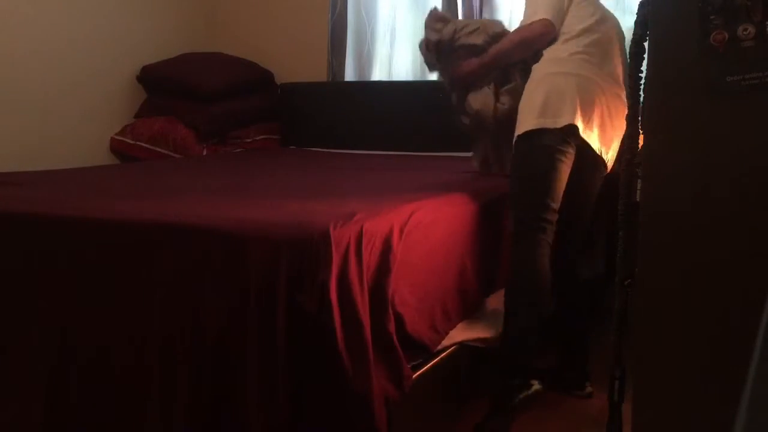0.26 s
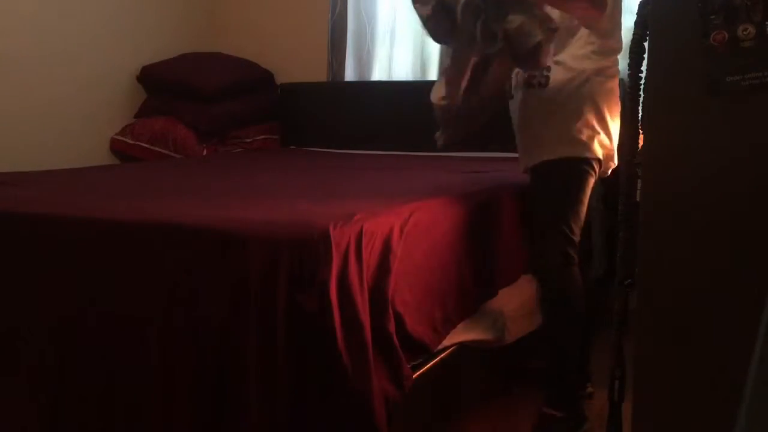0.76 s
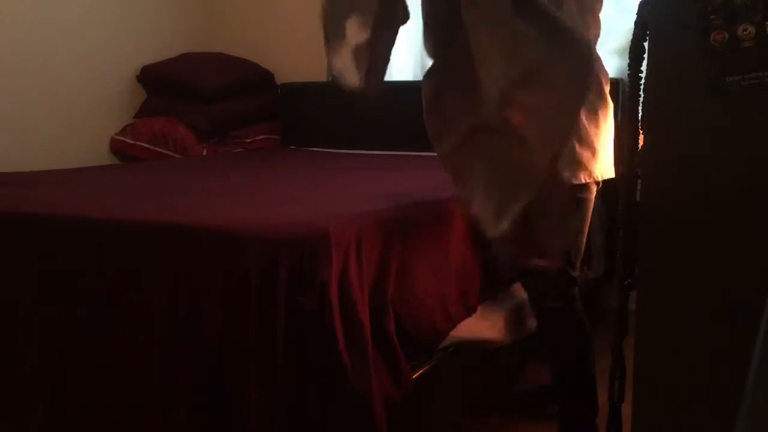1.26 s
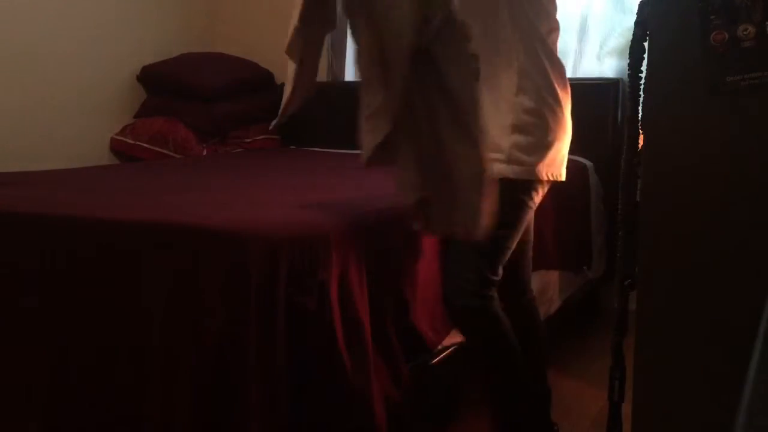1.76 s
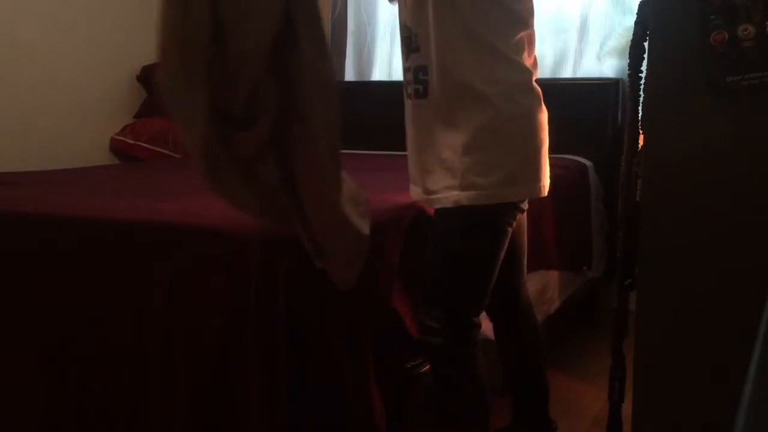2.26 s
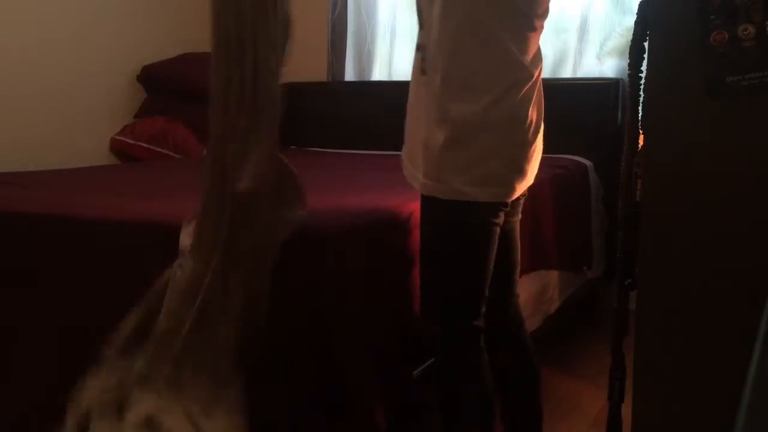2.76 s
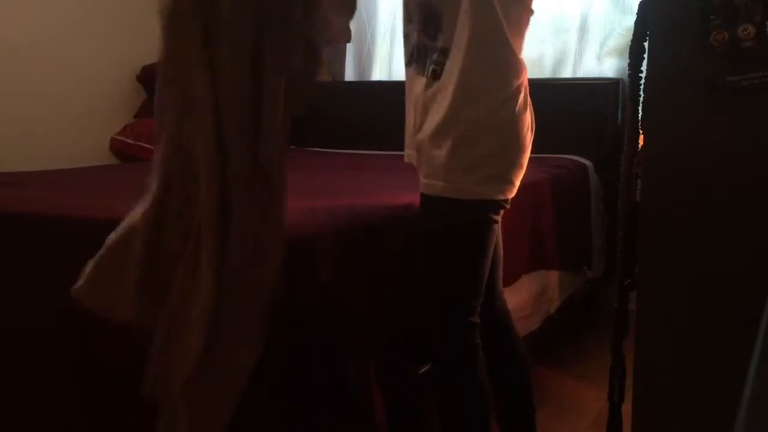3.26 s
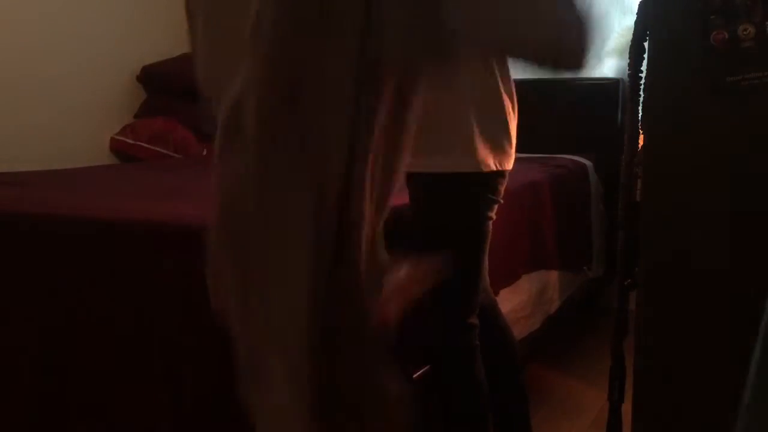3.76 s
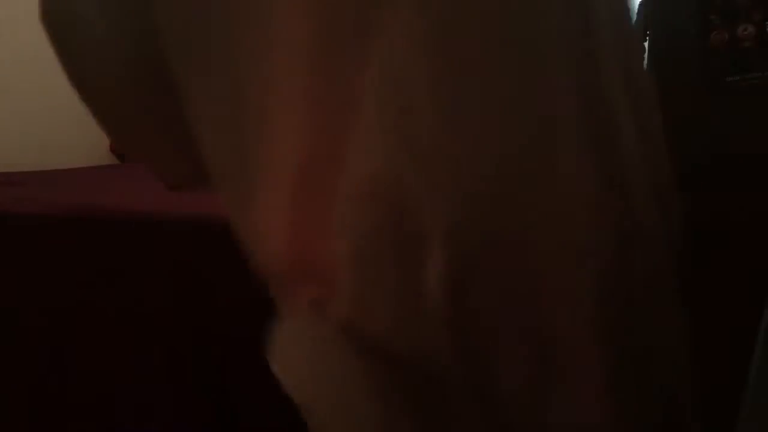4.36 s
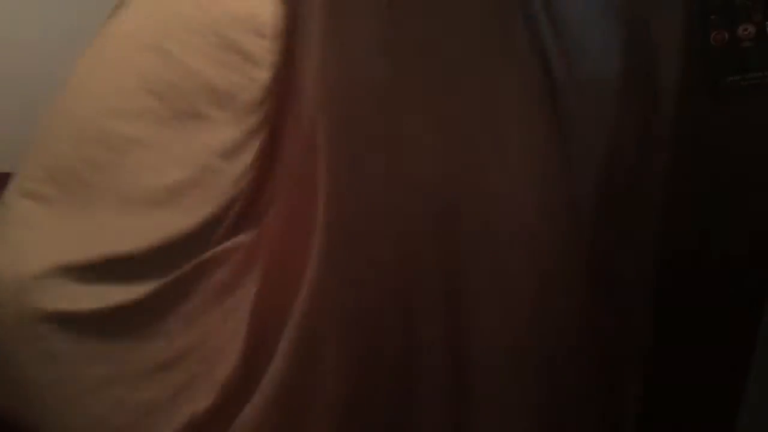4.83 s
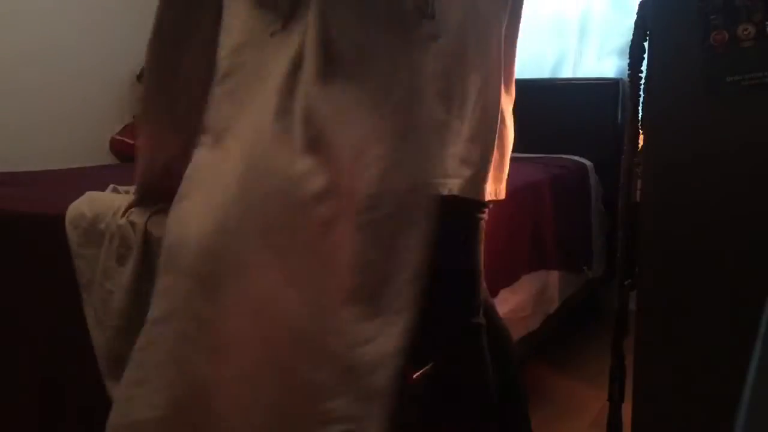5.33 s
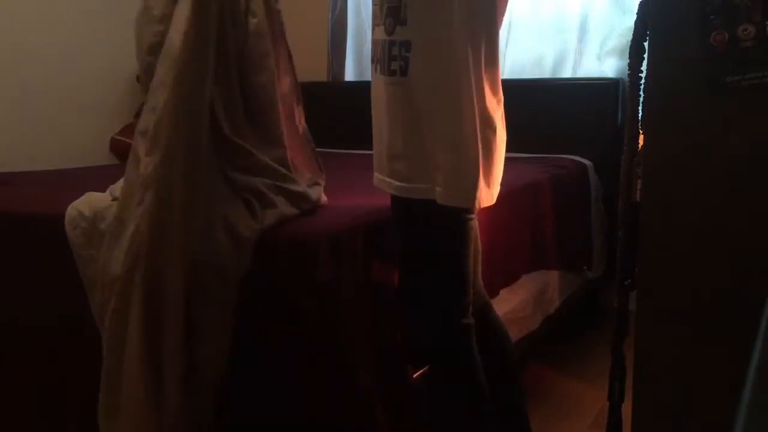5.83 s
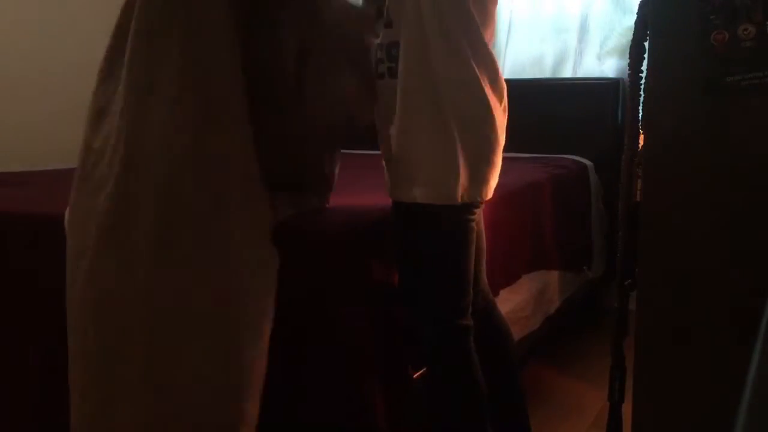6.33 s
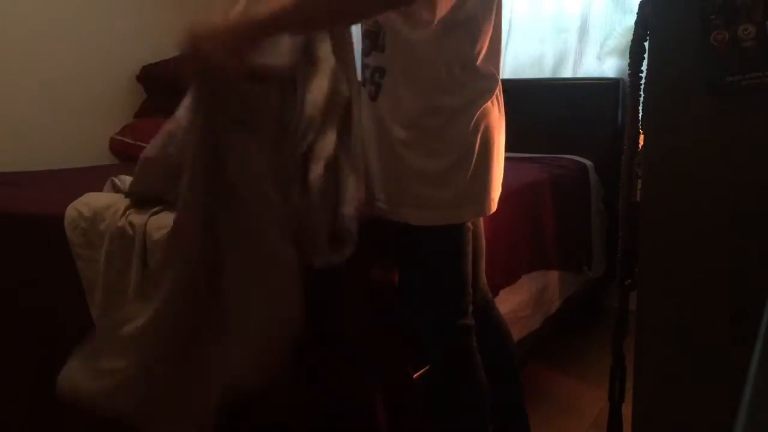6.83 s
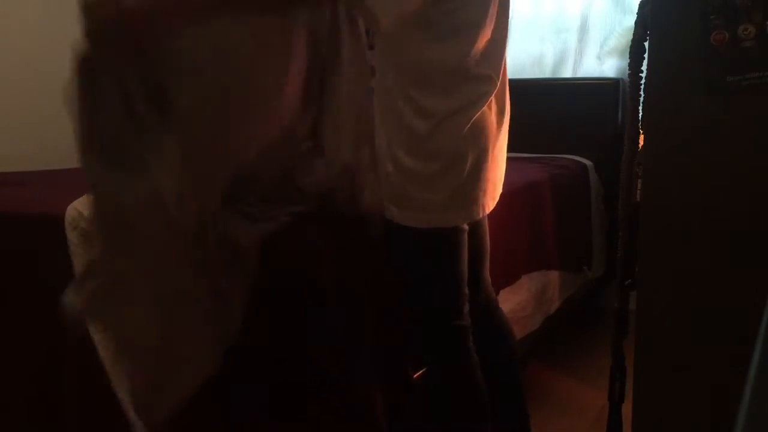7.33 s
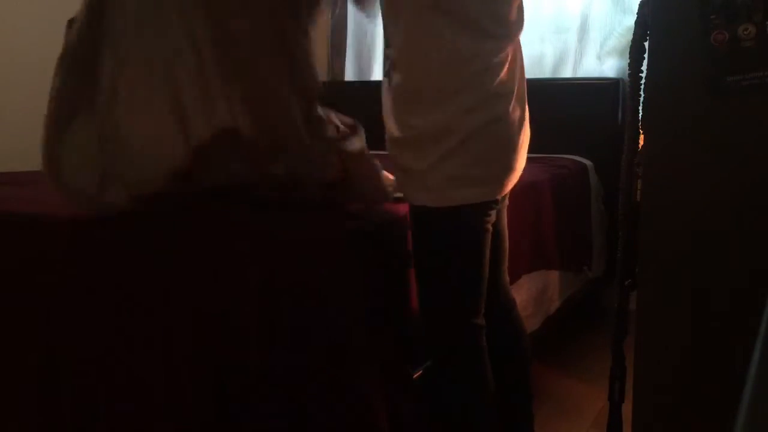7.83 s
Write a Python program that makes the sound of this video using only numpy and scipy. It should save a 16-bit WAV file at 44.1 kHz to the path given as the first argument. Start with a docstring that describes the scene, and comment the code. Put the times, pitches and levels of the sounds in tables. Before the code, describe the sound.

A fabric bedsheet is shaken and spread in a small bedroom, with soft flaps, rustling slides, sharp little snaps and dull knocks.

```python
"""A bedsheet is unbundled, shaken and spread in a small bedroom: friction noise made of countless tiny slips,
shaped by movement into low billowing flaps, hissing slides and rustling creases.
Short filtered bursts make its taut snaps and light clicks, and decaying sines the dull knocks of the handling.
Close walls briefly answer the cloth and the snaps; broad swings push low gusts of filtered noise.
An uneven low rumble and a faint steady hiss lie beneath."""
import sys
import numpy as np
from scipy import signal
from scipy.fft import rfft, irfft, next_fast_len
from scipy.io import wavfile
from scipy.ndimage import map_coordinates

SR = 44100
rng = np.random.default_rng(int(sys.argv[2]) if len(sys.argv) > 2 else 0)


def wav_record(signal):
    """Record a signal, one row per channel, as 16-bit PCM in the file named by sys.argv[1]."""
    frames = np.transpose(np.atleast_2d(signal))
    bounded = np.clip(frames, -1, 1)
    # unit amplitude maps onto the largest positive 16-bit level
    quanta = np.round(bounded * 32767).astype(np.int16)
    wavfile.write(sys.argv[1], SR, quanta)


N = 356945  # length in samples

# bed of low rumble and airy hiss, spectra: f/Hz, density/dB per Hz (relative)
RUMBLE = [(20, -60), (35, -29), (50, -29), (72, -6.5), (95, -5), (116, 1.5), (145, -5.5), (185, -14),
          (250, -25.5), (400, -36), (900, -68)]
AIR = [(100, 3), (400, -0.5), (1000, -3), (2000, -6), (4000, -9), (7000, -12.5), (9000, -13), (10400, -17),
       (11500, -14.5), (16000, -20)]

# gusts pushed by the sheet, spectrum: f/Hz, density/dB per Hz (relative)
DRAUGHT = [(20, -44), (33, -13), (47, -2.5), (70, 3), (130, -4.5), (220, -15.5), (500, -48)]
# broad swings of the whole sheet: t/s at the height, level/dB, length/s
SWINGS = [(1.65, -46.5, 0.31), (2.846, -52.5, 0.77), (3.753, -50, .5), (4.397, -53.5, 2.3),
          (5.33, -57, 0.63), (6.718, -50.5, 0.29), (7.55, -53.5, 2.2)]

# dull knocks against bed and floor: t/s, peak level/dB
KNOCKS = [(.19, -47.5), (1.002, -32.5), (1.015, -32.5), (1.08, -34.5), (1.588, -36), (1.63, -37.5),
          (2.08, -30.5), (3.746, -31.5), (7.983, -38)]
# modes the knocks ring with, before small random changes: f/Hz, relative level/dB, t60/s
WOOD = [(81.6, -7, 0.25), (126.4, -6.5, 0.23), (191, 3, 0.25), (266, 0, 0.14), (372.3, 2, 0.16),
        (466, -14, 0.12), (1437, -13, 0.23), (1820, -14, 0.31), (2110, -24, 0.39), (2250, -24, 0.37)]

# bedroom tail: f/Hz, t60/s
ROOM = [(150, 0.55), (600, 0.27), (2000, 0.21), (5000, 0.23), (9000, 0.21), (15000, 0.095)]
# nearest surfaces, nominal: delay/s, gain re direct sound
WALLS = [(.0083, 0.49), (0.0097, .3), (0.0129, .22), (0.0184, .2)]
# colour of sound reaching the microphone head-on, before any wall: f/Hz, level/dB
DIRECT = [(250, -3.5), (1000, 1.5), (2000, 0.5), (3100, 5.5), (4200, 2.5), (5300, -4), (8500, -1.5),
          (12000, -1), (16000, 0)]

# sharp snaps and clicks of the handling: t/s, crack level/dB over 10 ms, crack pitch f/Hz,
# upper corner of the crack f/Hz, body level/dB re crack, edge level/dB re crack
SNAPS = [(0.0706, -54.5, 2000, 3000, -13, 7.5), (0.7649, -46, 2270, 4500, -10.5, -1),
         (0.8175, -49.5, 2230, 5460, -25, -0.5), (0.8517, -55.5, 3200, 2800, -14, 4),
         (0.9022, -56.5, 2870, 5500, -17, -1), (1.0016, -40.5, 1670, 4030, -5, -38),
         (1.0726, -31.5, 2120, 5200, -1.5, -7), (1.217, -57.5, 1320, 5540, 1.5, -16),
         (1.587, -48.5, 2020, 4040, 0.5, -16), (1.6134, -43.5, 2460, 2500, -0.5, -24),
         (2.0686, -39.5, 1560, 3600, -2, -25), (2.5677, -36.5, 1860, 4560, -11, -7.5),
         (2.7228, -47, 3220, 3460, -6, -15), (3.3257, -39, 1530, 3350, -6.5, -9),
         (3.744, -37, 1760, 4600, 3, -6.5), (3.7496, -51, 1300, 2600, 12.5, -15),
         (4.0395, -43.5, 2000, 3570, -11, -6.5), (4.073, -45, 2780, 2950, 0.5, -28),
         (4.196, -42, 1230, 2380, 3, -22), (4.4439, -52.5, 1290, 3000, 6.5, -12),
         (4.7209, -47, 2374, 2320, -4.5, -27), (4.742, -48.5, 910, 5330, -1, -14),
         (4.9318, -40, 2360, 2440, -9, -8), (5.0465, -44, 1660, 5600, -5, -4.5),
         (5.1116, -48.5, 2020, 4540, -3, -19), (5.9119, -39.5, 1730, 3800, -8.5, -16),
         (6.0445, -47, 1160, 2720, -9, -35), (6.9328, -59.5, 900, 1500, 5.5, -30),
         (7.6441, -43.5, 2010, 6030, -7.5, -13), (7.8735, -41, 2110, 4500, -14, -9.5),
         (7.9171, -41.5, 1650, 3440, -7, -12), (7.9807, -40.5, 1780, 4570, 4, -22)]
# hollow body below the crack, and crisp edge above it: f/Hz, relative level/dB
BODY = [(60, -32), (200, -3.5), (370, 1), (650, 3), (1000, -6.5), (1400, -1.5), (2000, -5.5), (5000, -57)]
EDGE = [(1500, -32), (3000, 1.5), (4200, -1), (5000, -3), (6400, 1), (8800, 2.5), (10500, -1.5), (12000, 5),
        (16000, 4.5)]
# resonances shared by all snaps: f/Hz, width/Hz, boost/dB
CLACK = [(372, 150, 7.5), (959, 204, 8.5), (1447, 94, 6), (2120, 250, 3), (2950, 120, -0.5),
         (4400, 260, 5.5), (5900, 890, 6.5)]
# top of a snap's edge at 0 dB; a crisper edge reaches higher
REACH_HZ, REACH_HZ_PER_DB = 12840, 156
# snaps above this level come from heavy folds and reach less high
HEAVY_DB, HEAVY_HZ_PER_DB = -36.5, 650
# the cloth tightens around each snap: level re the snap, time to rise or fall 60 dB
LEAD_IN_DB, LEAD_IN_S = -13, 0.041

# large folds, creases, hiss of the weave, fizz of its fibres, spectra: f/Hz, density/dB per Hz (relative)
BILLOW = [(110, -10), (170, 2.5), (240, -1.5), (290, -3.5), (350, 4), (480, -1), (620, -1.5), (1000, -5),
          (1500, -12.5), (2400, -30), (5000, -61)]
RUSTLE = [(500, -2.5), (1200, 3), (1800, 3), (2400, 0), (3200, -13), (4200, -12), (5200, -15), (10000, -28)]
WEAVE = [(1500, -1.5), (3900, 1), (4900, -1), (5700, 2), (6400, 1.5), (7600, -4), (9000, -6.5),
         (10500, -12), (16000, -22)]
FIBRES = [(3000, -12), (7000, -6), (9000, -0.5), (10500, -6), (12000, 0), (16000, -6)]
# a large fold fills with air and collapses: t/s at the height, level/dB, length/s, crease rustle level/dB re flap
FLAPS = [(.215, -64, 0.14, -13), (1.217, -60.5, 0.26, -12), (1.682, -71, .14, -13),
         (2.736, -45.5, 0.11, -16), (2.865, -44, 0.18, -15), (3.136, -47.5, 0.12, -7),
         (3.253, -54, 0.059, -13), (3.362, -46, 0.15, -8), (3.509, -46.5, .18, -16),
         (3.718, -38.5, 0.19, -12), (3.778, -42, 0.17, -17), (3.848, -45.5, 0.24, -14.5),
         (4.038, -46, 0.17, -10.5), (4.13, -44.5, 0.17, -7.5), (4.215, -36, 0.16, -12),
         (4.324, -46, 0.42, -23), (4.433, -46, .2, -20), (4.585, -45, 0.15, -8), (4.846, -55.5, 0.12, -25),
         (5.275, -49, 0.19, -20), (5.371, -56, 0.19, -17), (6.266, -65, 0.22, -7),
         (6.515, -67.5, 0.16, -11), (6.649, -49.5, 0.15, -10), (6.735, -57.5, 0.15, -15),
         (6.983, -52.5, .07, -24), (7.124, -64, 0.71, -7.5), (7.316, -50, 0.24, -18),
         (7.464, -49, 0.37, -24), (7.585, -55.5, 0.18, -18), (7.712, -44.5, 0.15, 0.5)]
# cloth slides over cloth: t/s at the height, level/dB, attack/s, release/s,
# crease rustle level/dB re slide, fibre fizz level/dB re slide
SLIDES = [(0.249, -73, 0.11, 0.16, 2, -4), (.79, -80, 0.13, 0.31, 9, -5), (1.17, -65.5, 0.33, .2, 2, -11),
          (1.648, -57.5, 0.05, 0.038, -7, -11), (2.61, -56.5, .08, 0.27, 5.5, -15),
          (2.83, -56.5, 0.11, 0.3, 3.5, -1.5), (2.97, -57.5, 0.23, 0.2, 8, -16),
          (3.53, -66, 0.43, 0.25, 5.5, -3), (3.755, -57, 0.08, 0.11, 2, -2.5),
          (4.08, -69.5, 0.31, 0.34, 8.5, -10), (4.475, -55, 0.17, 0.25, -7, -10),
          (4.9, -68, 0.14, 0.32, 1, -3.5), (5.335, -64, 0.2, 0.41, 2, -6), (6.32, -75, 0.19, 0.23, 4, -2),
          (6.7, -63, 0.19, 0.27, -4, -7.5), (7.33, -65, 0.2, 0.34, 6, -8), (7.7, -79, 0.27, 1, 4, -9)]
# the held sheet is never quite still: part of the sound, level/dB
STIR_DB = {"billow": -79, "rustle": -80.5, "weave": -83.5, "draught": -67}
FLAP_ATTACK = 0.41  # share of the length spent rising
FLAP_SHAPE, SLIDE_SHAPE = 1.34, 1.42  # 1 = pointed crest, 2 = round

TOP_HZ = 16000  # upper band limit


def amp(db):
    """Decibels to gain."""
    return 10 ** (np.asarray(db) / 20)


def unit(x):
    """Scaled to rms 1."""
    return x / np.sqrt(np.mean(x ** 2) + 1e-20)


def along(points, hz):
    """(Hz, value) points read on a log frequency axis."""
    f, v = np.transpose(points)
    return np.interp(np.log(hz + 1), np.log(f + 1), v)


def wobble(rate):
    """A smooth random curve, rate knots a second."""
    knots = rng.standard_normal(int(N * rate / SR) + 4)
    return map_coordinates(knots, [np.arange(N) * rate / SR])


def filtered(x, response):
    """x times a response of frequency."""
    m = next_fast_len(N + 8192)
    return irfft(rfft(x, m) * response(np.fft.rfftfreq(m, 1 / SR)), m)[:N]


def coloured(x, spectrum):
    """x filtered by the given spectrum, at rms 1."""
    return unit(filtered(x, lambda hz: amp(along(spectrum, hz))))


def causal(gain):
    """The most compact (minimum-phase) pulse with this shape of spectrum, at energy 1."""
    cepstrum = irfft(np.log(np.maximum(gain, 1e-6)))
    half = len(cepstrum) // 2
    # folding the cepstrum forward moves the energy as early as it can go
    cepstrum[1:half] *= 2
    cepstrum[half + 1:] = 0
    pulse = irfft(np.exp(rfft(cepstrum)))
    return pulse / np.linalg.norm(pulse)


def add(track, s, sound):
    """Mixes a sound into the track at s seconds."""
    part = track[max(round(s * SR), 0):][:len(sound)]
    part += sound[:len(part)]


def swell(peak_s, db, attack, release, shape):
    """Power of one movement: it climbs 20 dB over the attack and drops 20 dB over the release."""
    t = np.arange(N) / SR - peak_s
    drop_db = 20 * np.maximum(-t / attack, t / release) ** shape
    return amp(db - np.minimum(drop_db, 100)) ** 2


def patchy(x, depth_db, width_hz, life_s):
    """The changing shape of the cloth favours some narrow bands for a moment and weakens others."""
    hz, t, z = signal.stft(x, SR, nperseg=1024)
    knots = rng.standard_normal((400, 1000))
    places = np.meshgrid(hz / width_hz, t / life_s, indexing="ij")
    field = map_coordinates(knots, places, mode="wrap")
    gain = amp(depth_db * np.clip(field, -2, 2))
    return signal.istft(z * unit(gain), SR, nperseg=1024)[1][:N]


def bedroom(tail_db, build):
    """Direct sound, first reflections and a diffuse tail for one spot in the room, with energy 1."""
    hz, t, z = signal.stft(rng.standard_normal(SR // 3), SR, nperseg=256)
    decay = amp(-60 * t / along(ROOM, hz)[:, None])
    tail = signal.istft(z * decay, SR, nperseg=256)[1]
    # the tail builds up with this time constant in seconds
    tail *= 1 - np.exp(-np.arange(len(tail)) / SR / build)
    answer = amp(tail_db) * tail / np.linalg.norm(tail)
    add(answer, 0, causal(amp(along(DIRECT, hz))))
    for delay, gain in WALLS:
        # each spot has its own distance to the wall
        add(answer, delay * rng.uniform(.9, 1.2), np.array([gain]))
    return answer / np.linalg.norm(answer)


def background():
    """A low, uneven rumble and a faint even hiss, both filtered noise."""
    rumble_gain = amp(-56.0 + 4.7 * np.tanh(wobble(18)))
    rumble = rumble_gain * coloured(rng.standard_normal(N), RUMBLE)
    hiss = amp(-71.0) * coloured(rng.standard_normal(N), AIR)
    return rumble + hiss


def draught():
    """Each broad swing of the sheet pushes a low gust of air: noise under a swell."""
    power = np.full(N, amp(STIR_DB["draught"]) ** 2)
    for s, db, length in SWINGS:
        power += swell(s, db, length / 2, length / 2, shape=1.3)
    return np.sqrt(power) * coloured(rng.standard_normal(N), DRAUGHT)


def knocks():
    """Soft blows ring the modes of the wood, at new strengths and slightly new pitches each time."""
    track, t = np.zeros(N), np.arange(SR // 3) / SR
    hz, level, t60 = np.transpose(WOOD)[:, :, None]
    for s, db in KNOCKS:
        strength, detune, phase = rng.standard_normal((3, len(WOOD), 1))
        envelope = amp(level + 1.2 * strength - 60 * t / t60)
        mode_hz = hz * (1 + 0.01585 * detune)
        ring = envelope * np.sin(2 * np.pi * (mode_hz * t + phase))
        # a soft contact: the onset has a time constant of 1.1 ms
        blow = ring.sum(axis=0) * (1 - np.exp(-t / 0.0011))
        add(track, s, amp(db) * blow / np.abs(blow).max())
    return track


def slip_burst(rise, fall, lead, evenness):
    """A soft rub around a tight cluster of slips, lead seconds in; evenness 0-1 smooths its chance colour."""
    t = np.arange(2048) / SR - lead
    # rise and fall are the times to change by 60 dB
    cluster = rng.standard_normal(len(t)) * amp(-60 * np.maximum(-t / rise, t / fall))
    spectrum = rfft(cluster)
    slips = irfft(spectrum / np.abs(spectrum) ** evenness)
    rub = rng.standard_normal(len(t)) * amp(-60 * np.abs(t) / LEAD_IN_S)
    return unit(slips) + amp(LEAD_IN_DB) * unit(rub)


def snap(pitch_hz, corner_hz, body_db, edge_db, reach_hz, sharpness=1.4):
    """One pulse: a broad crack round its pitch, a hollow body below and a crisp edge above."""
    hz = np.fft.rfftfreq(2048, 1 / SR) + 1
    crack = 1 / np.hypot(1, sharpness * (hz / pitch_hz - pitch_hz / hz))
    # a softer contact has a lower upper corner
    crack /= np.hypot(1, (hz / corner_hz) ** 7)
    crack /= np.hypot(1, (800 / hz) ** 3)
    body = amp(along(BODY, hz))
    edge = amp(along(EDGE, hz)) / np.hypot(1, (hz / reach_hz) ** 6)
    ring = amp(sum(db * np.exp(-((hz - centre) / width) ** 2) for centre, width, db in CLACK))
    power = unit(crack) ** 2 + (amp(body_db) * unit(body)) ** 2 + (amp(edge_db) * unit(edge)) ** 2
    return causal(ring * np.sqrt(power))


def snaps():
    """Every snap is a tight burst of slips through its own pulse, ringing round the room."""
    track = np.zeros(N)
    lead = .02  # seconds of rub ahead of the snap
    for s, db, pitch_hz, corner_hz, body_db, edge_db in SNAPS:
        heaviness_db = max(db - HEAVY_DB, 0)
        reach_hz = REACH_HZ + REACH_HZ_PER_DB * edge_db - HEAVY_HZ_PER_DB * heaviness_db
        reach_hz = max(reach_hz, corner_hz)
        slips = slip_burst(rise=0.0028, fall=0.0078, lead=lead, evenness=0.63)
        pulse = np.convolve(slips, snap(pitch_hz, corner_hz, body_db, edge_db, reach_hz))
        heard = signal.fftconvolve(pulse, bedroom(tail_db=-2.0, build=0.0044))
        # body and edge add their power to that of the crack
        level = amp(db) * np.sqrt(1 + amp(body_db) ** 2 + amp(edge_db) ** 2)
        # the level is the rms of the whole energy taken over 10 ms
        add(track, s - lead, level * np.sqrt(SR / 100) * heard / np.linalg.norm(heard))
    return track


def movements():
    """Power of each part of the cloth's sound: flaps billow, slides hiss and fizz, both rustle the creases."""
    billow, rustle, weave = [np.full(N, amp(STIR_DB[part]) ** 2) for part in ("billow", "rustle", "weave")]
    fibres = np.zeros(N)
    for s, db, length, crease_db in FLAPS:
        power = swell(s, db, FLAP_ATTACK * length, (1 - FLAP_ATTACK) * length, FLAP_SHAPE)
        billow += power
        rustle += power * amp(crease_db) ** 2
    for s, db, attack, release, crease_db, fizz_db in SLIDES:
        power = swell(s, db, attack, release, SLIDE_SHAPE)
        weave += power
        fibres += power * amp(fizz_db) ** 2
        rustle += power * amp(crease_db) ** 2
    return billow, rustle, weave, fibres


def friction(rate, spread_db, flutter_db, flutter_rate, drift_db, count=5):
    """Tiny slips, rate a second at each of several spots, clumped by flutter and blurred by the room."""
    flutter = amp(flutter_db * np.tanh(wobble(flutter_rate)))
    # the work drifts from spot to spot, each with its own colour
    shares = amp(drift_db * np.array([wobble(14) for spot in range(count)]))
    shares /= np.linalg.norm(shares, axis=0)
    sound = np.zeros(N)
    for share in shares:
        at = rng.integers(0, N, int(rate * N / SR))
        side, strength = rng.standard_normal((len(at), 2)).T
        sizes = np.sign(side) * amp(spread_db * np.tanh(strength))
        slips = np.bincount(at, sizes, N)
        sound += signal.oaconvolve(slips * flutter * share, bedroom(tail_db=-1.0, build=0.003))[:N]
    return sound


def sheet():
    """Four sizes of slip, from large folds down to fibres, each driven by the movements."""
    billow, rustle, weave, fibres = np.sqrt(movements())
    folds = friction(rate=600, spread_db=6.5, flutter_db=4.5, flutter_rate=65, drift_db=9)
    creases = friction(rate=130, spread_db=7.5, flutter_db=3.5, flutter_rate=81, drift_db=5)
    hiss = friction(rate=550, spread_db=2.5, flutter_db=4.0, flutter_rate=72, drift_db=5.5)
    fizz = friction(rate=1200, spread_db=3, flutter_db=0.5, flutter_rate=70, drift_db=6)
    return (billow * coloured(folds, BILLOW)
            + rustle * coloured(creases, RUSTLE)
            + weave * coloured(hiss, WEAVE)
            + fibres * coloured(fizz, FIBRES))


def scene():
    """All sources at one microphone."""
    cloth = patchy(sheet(), depth_db=2.5, width_hz=150, life_s=.03)
    cracks = patchy(snaps(), depth_db=1.95, width_hz=201, life_s=.05)
    return (cloth + draught() + cracks + knocks() + background())[None]


def record(dry, low_cut_hz=36):
    """The pickup cuts the deep bass and keeps nothing from its band limit up."""
    def response(hz):
        return (hz < TOP_HZ) / np.hypot(1, (low_cut_hz / (hz + 1)) ** 5)
    return np.array([filtered(channel, response) for channel in dry])


dry = scene()
out = record(dry)
wav_record(out)
```